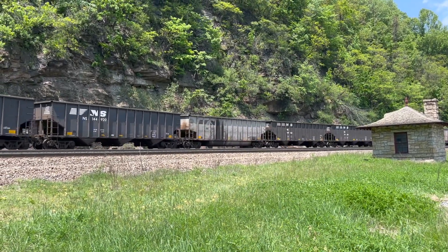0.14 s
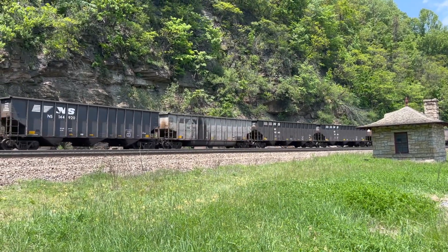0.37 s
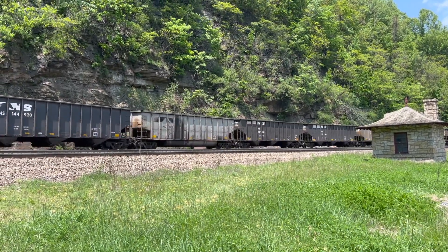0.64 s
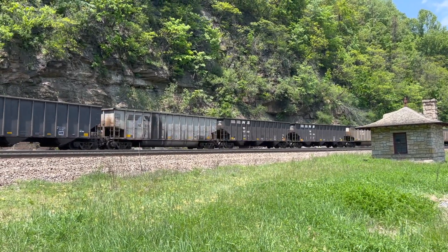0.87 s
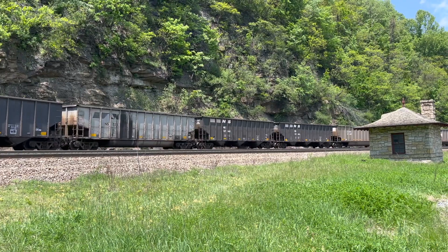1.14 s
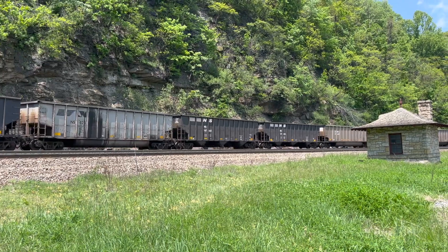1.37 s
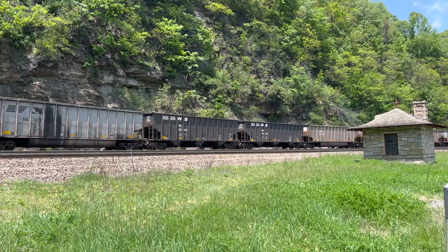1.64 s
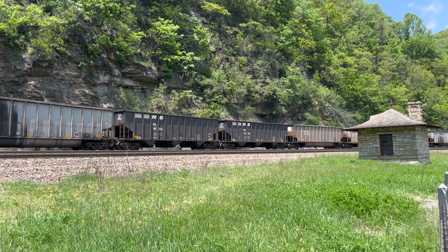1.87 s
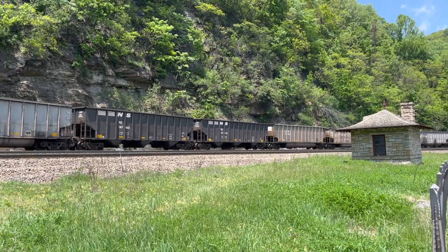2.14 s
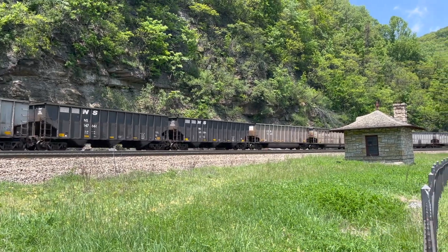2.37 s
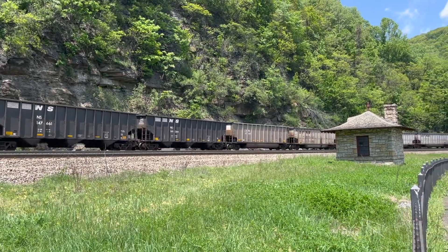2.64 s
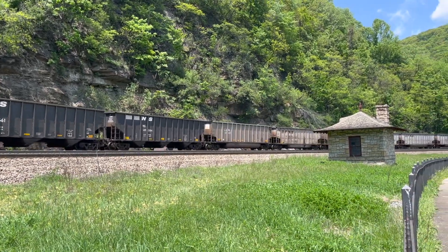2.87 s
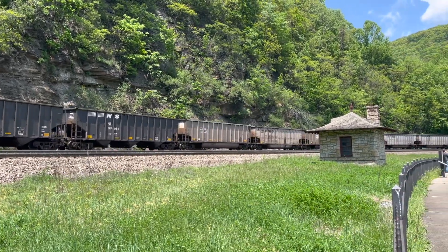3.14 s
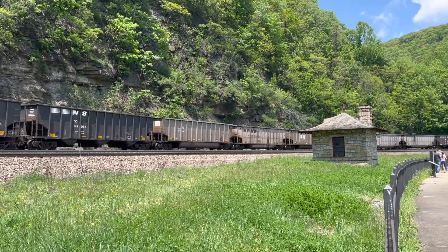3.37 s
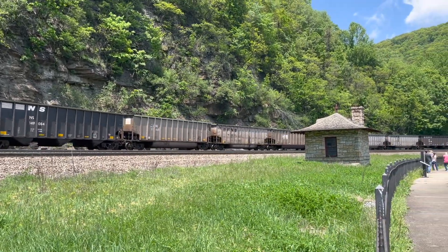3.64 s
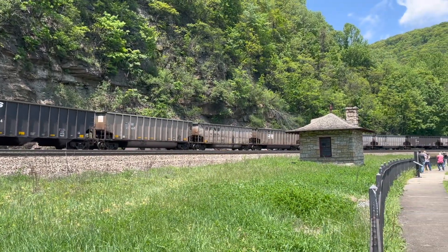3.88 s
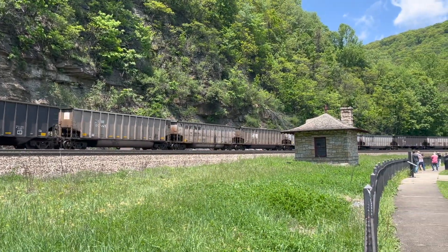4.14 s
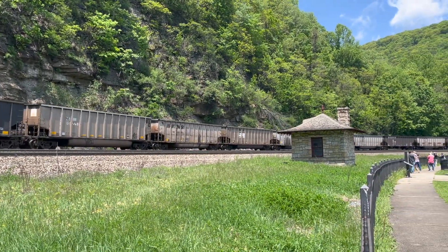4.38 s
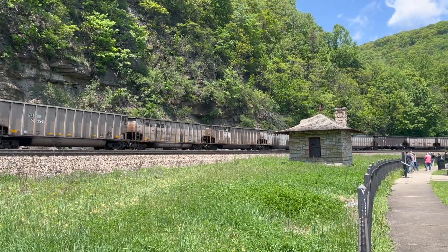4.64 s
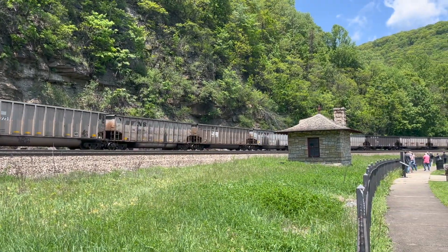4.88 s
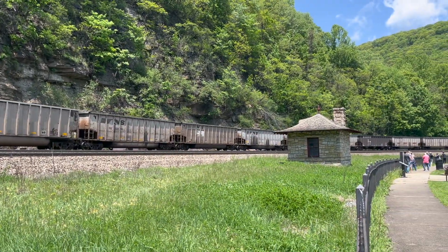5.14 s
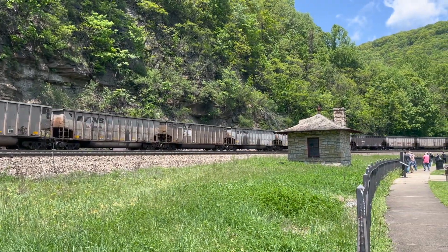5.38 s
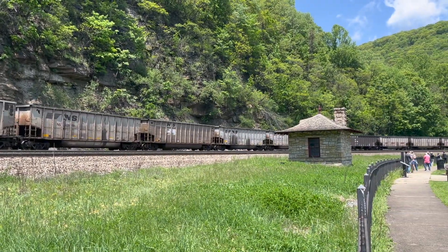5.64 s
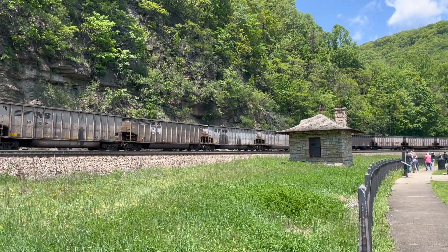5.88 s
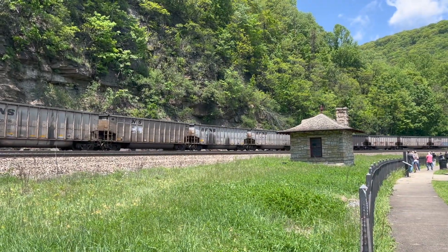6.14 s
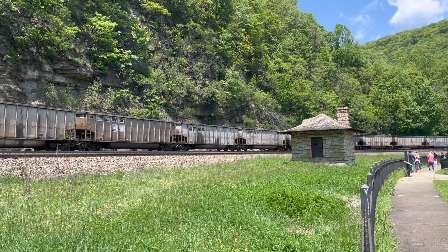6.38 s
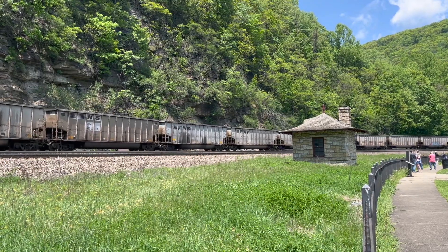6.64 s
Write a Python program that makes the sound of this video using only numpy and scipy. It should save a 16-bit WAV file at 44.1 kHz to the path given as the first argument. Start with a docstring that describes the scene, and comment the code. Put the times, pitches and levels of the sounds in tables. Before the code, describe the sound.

A heavy freight train passes continuously at middle distance, low and rumbling, with a droning engine and faint metallic singing from the wheels. Early on, one distant horn chord of about a second and a half shimmers in the air and trails off into hillside reverberation. Afterward the roar continues, slightly softer, with high squeals coming and going, a muted knock and tiny rustles near the handheld stereo phone, in open air.

```python
"""A freight train rumbles and roars on a curve below a wooded rock face, heard from a phone on the grass.
Diesel orders drone under narrow exhaust noise; stick-slip wheel modes squeal as wavering tones.
A distant five-bell air horn, built from reed partials, blows one long chord that shimmers in warm air
and rings off the hillside as a decaying noise tail. A wagon knock and dry rustles are short noise bursts."""
import sys
import numpy as np
from scipy import signal
from scipy.fft import rfft, irfft
from scipy.io import wavfile
from scipy.ndimage import uniform_filter1d

SR = 44100
rng = np.random.default_rng(int(sys.argv[2]) if len(sys.argv) > 2 else 0)


def dump(signal):
    """Clip the signal to [-1, 1] and save it as 16-bit WAV at the path in sys.argv[1]."""
    limited = np.clip(np.atleast_2d(signal).T, -1, 1)
    pcm = np.round(limited * 32767).astype(np.int16)
    wavfile.write(sys.argv[1], SR, pcm)


def boost_factor(decibels):
    """Convert a level in decibels to a linear amplitude factor."""
    exponent = np.asarray(decibels, float) / 20
    return 10 ** exponent


N = 298116
T = np.arange(N) / SR
F = np.arange(N // 2 + 1) * SR / N


def level(x, db):
    """Scale to an rms level."""
    return x * boost_factor(db) / np.sqrt(np.mean(np.abs(x) ** 2))


def curve(rows, at=T):
    """Columns of a table joined by straight lines."""
    s, *columns = np.transpose(rows)
    return [np.interp(at, s, c) for c in columns]


def walk(rate_per_s, at=T):
    """Smooth random drift, spread 1: noise averaged twice over 1 / rate."""
    k = max(int(SR / 32 / rate_per_s), 1)
    slow = rng.standard_normal(N // 32 + 1)
    slow = uniform_filter1d(uniform_filter1d(slow, k), k)
    return np.interp(at, np.arange(len(slow)) * 32 / SR, level(slow, 0))


def shaped(gain):
    """Noise whose density per Hz is the square of the gain."""
    spectrum = rng.standard_normal(len(F)) + 1j * rng.standard_normal(len(F))
    return irfft(gain * spectrum, N) * np.sqrt(SR * N / 4)


def ring(hz, width_hz):
    """Noise in a resonance applied twice, rms 1."""
    return level(shaped(1 / (1 + (2 * (F - hz) / width_hz) ** 2)), 0)


def coloured(table, flicker_db, count):
    """Noise of a given spectrum whose overlapping bands each flicker alone."""
    hz, db = np.transpose(table)
    gain = boost_factor(np.interp(np.log(F + 1), np.log(hz), db, left=-200, right=-200))
    noise = rfft(shaped(gain))
    place = count * np.log((F + 1) / hz[0]) / np.log(hz[-1] / hz[0])
    bands = (irfft(noise * np.clip(1 - abs(place - k), 0, 1), N) for k in range(count + 1))
    return sum(b * boost_factor(flicker_db * walk(4.75)) for b in bands)


def swept(hz, width_hz):
    """Narrow noise carried on a moving pitch, rms 1."""
    envelope = walk(width_hz) + 1j * walk(width_hz)
    return level(np.real(envelope * np.exp(2j * np.pi * np.cumsum(hz) / SR)), 0)


def bursts(rows):
    """Gaussian swells of level; length is centre to 1/e."""
    return sum(boost_factor(db) * np.exp(-((T - s) / length) ** 2) for s, db, length in rows)


def lead(x, seconds):
    """Side signal of a sound that reaches the left port sooner."""
    return np.gradient(x) * SR * seconds / 2


# horn through moving air: t/s, low-partial level/dB, middle level/dB, top level/dB
HORN_PATH = [(1.458, -38.5, -22, -24.5), (1.54, -30.5, -36, -37), (1.61, -23.5, -31, -26),
             (1.76, -29.5, -40.5, -36.5), (1.86, -24, -26, -25), (1.95, -31.5, -35, -33),
             (2.09, -21, -23, -27.5), (2.19, -33, -28.5, -25.5), (2.24, -28, -36.5, -36),
             (2.3, -28.5, -35, -24), (2.42, -30, -44, -44), (2.49, -39, -25.5, -30.5),
             (2.59, -28.5, -42, -35.5), (2.67, -35, -16, -26), (2.74, -27, -34, -28.5),
             (2.93, -39.5, -54, -52), (3.1, -57, -41, -72)]
# bells: pitch/(share of HORN_HZ), partials 1.. level/dB over the path levels
HORN_BELLS = [(0.5811, [-13.5, 3, -7.5, -11, -28, -28, -25.5, -21]),
              (0.741, [2, 0.5, -16.5, -14, -20.5, -17, -15.5]),
              (.873, [-1.5, -3, -6.5, -15, -6, -28, -16.5, -12, -14, -41]),
              (1.002, [1, -7, -5.5, -8.5, -6.5, -10.5, -16.5, -22, -23]),
              (1.445, [-2.5, -12.5, -10.5, -19])]
# per bell, level/dB over the low path at even steps through the blast
BELL_LEVELS = [(-8, 1.5, -1.5, -0.5, -7), (5, -1, 0, -3.5, 15), (-4, -7, -7.5, -6, 12),
               (0.5, 0.5, -1.5, 2, -4), (5, 2.5, -0.5, 1, 6)]
# per bell, time to speak t/s
BELL_SPEAK_S = [0.11, 0.14, 0.037, 0.0066, 0.13]
# lowest partials, own swells: t/s, level/dB, length/s
LOWEST_SWELLS = [(2.1, -30.5, 0.18), (2.72, -36, 0.13)]
# horn between the ports: f/Hz, side over mid level/dB
HORN_SIDE_DB = [(330, -3.5), (520, -15), (650, -3), (900, 3), (1340, 1), (1560, 2), (1780, -18),
                (2300, -19), (3100, -6.5)]
HORN_HZ, SHARP_HZ, SETTLE_S = 444.3, 5, 0.2  # starts sharp, settles as the pressure sags
DIE_S = 0.15  # final fade
LOWEST_HZ, UPPER_HZ, TOP_HZ = 356, 1110, 2220  # splits between the path levels
FAR_HZ = 3300  # distance dulls the partials above it
BELL_FADE_DB, BELL_FADE_PER_S = 1.6, 9  # each bell wanders alone in the warm air
PARTIAL_FADE_DB, PARTIAL_FADE_PER_S = 2.5, 6  # so does each upper partial
SHIMMER_DB, SMEAR_RAD, RASP_DB = 2, 0.55, -14  # all at 1300 Hz, see depth
SHIMMER_PER_S, RASP_PER_S = 17, 70
AIR_DB = -9  # air rush over the top level
HILL_T60_S, HILL_DB, HILL_HZ = 1.1, -15, 1500


def horn():
    """Five reed bells; moving air fades and blurs each partial, the hillside adds a tail."""
    on = slice(int(HORN_PATH[0][0] * SR), int(HORN_PATH[-1][0] * SR))
    t = T[on]
    pitch = HORN_HZ + SHARP_HZ * np.exp(-(t - t[0]) / SETTLE_S)
    low_db, middle_db, top_db = curve(HORN_PATH, t)
    lowest = bursts(LOWEST_SWELLS)[on]
    out = np.zeros((2, N))
    for (share, partials), bell_db, speak_s in zip(HORN_BELLS, BELL_LEVELS, BELL_SPEAK_S):
        steps_s = np.linspace(t[0], t[-1], len(bell_db))
        db = low_db + np.interp(t, steps_s, bell_db)
        db = db + BELL_FADE_DB * walk(BELL_FADE_PER_S, t)
        speak = 1 - np.exp(-((t - t[0]) / speak_s) ** 2)
        speak = speak * np.clip((t[-1] - t) / DIE_S, 0, 1)
        turn = np.cumsum(share * pitch) / SR
        for k, partial_db in enumerate(partials):
            hz = (k + 1) * share * pitch.mean()
            upper = 1 / (1 + (UPPER_HZ / hz) ** 5)
            top = 1 / (1 + (TOP_HZ / hz) ** 16)
            path_db = (1 - upper) * db + upper * ((1 - top) * middle_db + top * top_db)
            path_db = path_db + upper * PARTIAL_FADE_DB * walk(PARTIAL_FADE_PER_S, t)
            path = lowest if hz < LOWEST_HZ else boost_factor(path_db)
            tone = np.sqrt(2) * speak * boost_factor(partial_db) * path / (1 + (hz / FAR_HZ) ** 6)
            tone = tone * np.exp(2j * np.pi * ((k + 1) * turn + rng.random()))
            # scattering and rasp grow with pitch
            depth = (hz / 1300) ** 0.62
            fade, bend, apart = (walk(SHIMMER_PER_S, t) for _ in range(3))
            rasp = depth * boost_factor(RASP_DB) * (walk(RASP_PER_S, t) + 1j * walk(RASP_PER_S, t))
            scatter = boost_factor(SHIMMER_DB * depth * fade) * np.exp(1j * SMEAR_RAD * depth * bend)
            out[0, on] += np.real(tone * (scatter + rasp))
            side = -0.15 - 0.7j + 0.32 * (apart + 1j * bend) + rasp[::-1]
            side = side * boost_factor(np.interp(hz, *np.transpose(HORN_SIDE_DB)))
            out[1, on] += np.real(tone * side)
    air = level(shaped(np.exp(-((F - 2200) / 2600) ** 2)), 0)[on]
    air_rise = np.clip((t - t[0]) / BELL_SPEAK_S[3], 0, 1)
    out[0, on] += boost_factor(top_db + AIR_DB) * air_rise * air
    tail = rng.standard_normal((2, 2 * SR)) * boost_factor(-60 * T[:2 * SR] / HILL_T60_S)
    tail = signal.lfilter(*signal.butter(1, HILL_HZ, fs=SR), tail)
    tail = tail * boost_factor(HILL_DB) / np.sqrt(np.sum(tail[0] ** 2))
    return out + signal.fftconvolve(out[:1], tail, axes=1)[:, :N] * [[1], [0.6]]


# engine orders: f/(multiple of SHAFT_HZ), level/dB at start, midway, end
ENGINE_ORDERS = [(5, -21.5, -34.5, -25.5), (5.946, -51, -32.5, -27.5), (7.3, -40, -32.5, -44),
                 (8.13, -48.5, -28, -20.5), (8.69, -59, -43, -38.5), (9.79, -40, -50, -62),
                 (27.2, -42, -46, -43), (28.33, -37.5, -36.5, -29.5), (30.2, -52, -47.5, -34),
                 (31.34, -40.5, -38, -45.5)]
# exhaust stack resonance: t/s, level/dB
STACK_LEVEL = [(0.0, -49), (.4, -37), (.48, -23), (.6, -36.5), (1.3, -42), (1.45, -28), (1.84, -28.5),
               (2.05, -39), (2.4, -26), (3.1, -40.5), (4.3, -28), (4.62, -31.5), (4.9, -24), (5.4, -29),
               (6.45, -24), (6.6, -16.5), (6.68, -29.5), (6.76, -21)]
SHAFT_HZ, ENGINE_LEAD_S = 13.0, 0.0001
STACK_HZ, STACK_DRIFT_HZ, STACK_WIDTH_HZ, STACK_SIDE_DB = 377.6, 4, 37.8, -10.5


def engines():
    """Shaft orders that waver a little, and exhaust gas roaring in the stack."""
    turn = np.cumsum(SHAFT_HZ * (1 + 0.001623 * walk(0.56))) / SR
    hum = 0
    for k, *db in ENGINE_ORDERS:
        gain = boost_factor(np.interp(T, [0, T[-1] / 2, T[-1]], db) + 0.54 * walk(1.8))
        hum = hum + np.sqrt(2) * gain * np.sin(2 * np.pi * (k * turn + rng.random()))
    db, = curve(STACK_LEVEL)
    hz = STACK_HZ + STACK_DRIFT_HZ * walk(2.85)
    stack = [swept(hz, STACK_WIDTH_HZ) * boost_factor(db) for _ in range(2)]
    side = lead(hum, ENGINE_LEAD_S) + boost_factor(STACK_SIDE_DB) * stack[1]
    return np.array([hum + stack[0], side])


SQUEAL_ATTACK_S, SQUEAL_RELEASE_S = 0.03, 0.071
SQUEAL_FLUTTER_DB, SQUEAL_FLUTTER_PER_S = 2, 22
SING_SIDE_DB, SKIRT_HZ, BEAD_DB, BEAD_PER_S = -5, 60, 1.0, 60


def sing(mode_hz, clean, steady_db, squeals):
    """A wheel mode in stick-slip: a wavering, beading tone with a noisy skirt."""
    power = boost_factor(steady_db) ** 2
    for s, length, db in squeals:
        rise = np.clip((T - s) / SQUEAL_ATTACK_S, 0, 1)
        fall = np.exp(-np.clip(T - s - length, 0, None) / SQUEAL_RELEASE_S)
        power = power + (boost_factor(db) * rise * fall) ** 2
    hz = mode_hz * (1 + 0.0031 * walk(4.76))
    turn = 2 * np.pi * np.cumsum(hz) / SR + 1.06 * walk(14.6)
    mid = clean * np.sqrt(2) * np.sin(turn) + (1 - clean) * swept(hz, SKIRT_HZ)
    side = clean * np.sqrt(2) * np.cos(turn + 0.65 * walk(6.9)) + (1 - clean) * swept(hz, SKIRT_HZ)
    flutter_db = SQUEAL_FLUTTER_DB * walk(SQUEAL_FLUTTER_PER_S) + BEAD_DB * walk(BEAD_PER_S)
    return np.sqrt(power) * boost_factor(flutter_db) * np.array([mid, boost_factor(SING_SIDE_DB) * side])


# wheel modes: f/Hz, clean share, steady level/dB, squeals as (t/s, length/s, level/dB)
WHEEL_MODES = [(1614.2, 0.7, -47, [(.63, 0.48, -38.5), (.92, 0.19, -45), (1.16, 0.23, -35),
               (1.52, 0.23, -31.5), (2.02, 0.059, -30), (2.38, 0.26, -30.5), (3.27, 0.24, -41.5),
               (3.84, 0.11, -29.5), (4.1, 0.22, -42), (4.46, 0.62, -39.5), (5.22, 0.19, -33),
               (5.33, .22, -27.5), (5.72, 0.02, -28), (6.0, 0.13, -34.5), (6.3, 0.36, -37.5)]),
               (2660, 0.54, -52, [(3.75, 0.16, -44.5), (3.98, 0.12, -37), (4.07, 0.04, -31),
               (4.18, 0.36, -44.5), (4.41, 0.3, -42), (4.87, 0.54, -43.5), (5.93, 0.29, -38),
               (6.3, 0.22, -46)]), (3300, 0.32, -62, [(0.95, 0.29, -53)]),
               (4940, 0.83, -63.5, [(4.44, 0.24, -54), (4.85, .3, -60), (5.45, 0.34, -59.5)])]
# faint wheel and wagon rings: f/Hz, width/Hz, level/dB: mid start, mid end, side start, side end
WHEEL_RINGS = [(431.2, 7.9, -33.5, -61, -32.5, -52.5), (642, 34, -49, -49, -47, -54),
               (742, 50, -51.5, -45, -50.5, -50), (934, 60, -51, -54.5, -40.5, -50)]
# wagon knocks: t/s, level/dB, length/s
WAGON_KNOCKS = [(5.1, -40, 0.069)]


def wheels():
    """Stick-slip wheel modes, faint resonant rings and a knock between wagons."""
    out = sum(sing(*mode) for mode in WHEEL_MODES)
    for hz, width_hz, *db in WHEEL_RINGS:
        out[0] += ring(hz, width_hz) * boost_factor(np.linspace(db[0], db[1], N))
        out[1] += ring(hz, width_hz) * boost_factor(np.linspace(db[2], db[3], N))
    return out + bursts(WAGON_KNOCKS) * ring(2700, 1900) * [[1], [0.4]]


# train passing: t/s, rumble gain/dB, roar gain/dB, hiss gain/dB
ROLL_GAIN = [(0.0, -0.5, 1, -57.5), (.65, 4, 1.5, -57.5), (.9, 0.5, -0.5, -60.5), (1.55, -0.5, 1, -59),
             (2.4, 1.5, -1, -61.5), (3.0, 0, -.5, -62), (3.8, -1, -1.5, -61.5), (4.4, -1, -1.5, -64),
             (5.9, -2, -.5, -63), (6.3, -0.5, 0, -61.5), (6.76, 0, -1, -62.5)]
# ground rumble before gain: f/Hz, level/(dB per Hz)
RUMBLE_SPECTRUM = [(18, -66.5), (30, -52), (50, -41.5), (75, -45), (100, -43), (130, -50), (210, -52.5),
                   (260, -60), (330, -61), (450, -65.5)]
# wheel roar before gain, mid: f/Hz, level/(dB per Hz)
ROAR_SPECTRUM = [(240, -70), (400, -63), (520, -66), (800, -72), (1050, -69), (1300, -79), (1500, -72.5),
                 (1680, -67), (1900, -73.5), (2700, -75.5), (4000, -81), (6300, -88.5), (7400, -95.5),
                 (8200, -115)]
# wheel roar before gain, side: f/Hz, level/(dB per Hz)
ROAR_SIDE_SPECTRUM = [(200, -78), (400, -61.5), (600, -69.5), (1000, -68), (1350, -76.5), (1650, -64),
                      (1900, -85.5), (2300, -79.5), (3200, -78.5), (5000, -85.5), (8000, -93),
                      (9800, -93.5), (10600, -110)]
# hiss, shape only: f/Hz, relative level/(dB per Hz)
HISS_SPECTRUM = [(8700, -11.5), (9100, -5.5), (9600, -0.5), (13400, -4), (14200, -8), (14700, -19)]
RUMBLE_SIDE_DB, RUMBLE_LEAD_S = -14.5, 0.0004
ROAR_FLICKER_DB, HISS_FLICKER_DB = 1.1, 2


def rolling():
    """Ground rumble, wheel roar and thin hiss: shaped noise, each swelling as wagons pass."""
    rumble_db, roar_db, hiss_db = curve(ROLL_GAIN)
    rumble, roar = boost_factor(rumble_db), boost_factor(roar_db)
    ground = rumble * coloured(RUMBLE_SPECTRUM, 2.4, count=5)
    mid = ground + roar * coloured(ROAR_SPECTRUM, ROAR_FLICKER_DB, count=10)
    side = rumble * boost_factor(RUMBLE_SIDE_DB) * coloured(RUMBLE_SPECTRUM, 1.4, count=2)
    side = side + lead(ground, RUMBLE_LEAD_S)
    side = side + roar * coloured(ROAR_SIDE_SPECTRUM, ROAR_FLICKER_DB, count=8)
    hiss_mid = level(coloured(HISS_SPECTRUM, HISS_FLICKER_DB, count=3), -0.46)
    hiss = np.array([hiss_mid, boost_factor(-13) * ring(14200, 900)])
    return np.array([mid, side]) + boost_factor(hiss_db + 0.6 * walk(8)) * hiss


# rustles: t/s, level/dB, length/s
RUSTLE_BURSTS = [(4.37, -61, .02), (4.49, -56, .035), (4.69, -59, 0.045), (4.995, -57, 0.022),
                 (5.46, -57.5, 0.042), (5.58, -68, 0.044), (5.71, -65, 0.033), (5.9, -65, 0.018),
                 (6.37, -61, 0.032)]


def rustles():
    """Thin dry rustles near the phone: bursts of high resonant noise."""
    return bursts(RUSTLE_BURSTS) * np.array([ring(12500, 3000), boost_factor(-5) * ring(14500, 1200)])


def scene():
    """All sources as mid and side, turned into left and right."""
    mid, side = horn() + engines() + wheels() + rolling() + rustles()
    return np.array([mid + side, mid - side])


def band_limit(x):
    """A steep low-pass at the top of the band."""
    return signal.sosfilt(signal.butter(12, 14720, fs=SR, output="sos"), x)


# phone body shading one port: f/Hz, left minus right level/dB
PORT_LEAN = [(60, 0.5), (300, -0.9), (680, 2), (1250, -1.5), (2300, 0.5), (4200, 4.5), (7700, 0.5),
             (12000, -0.7)]


def record(dry):
    """The phone body colours the two ports apart, half the lean on each."""
    hz, db = np.transpose(PORT_LEAN)
    half = boost_factor(np.interp(np.log(F + 1), np.log(hz), db) / 2)
    mix = irfft(rfft(dry) * np.array([half, 1 / half]), N)
    return band_limit(mix)


dry = scene()
out = record(dry)
dump(out)
```